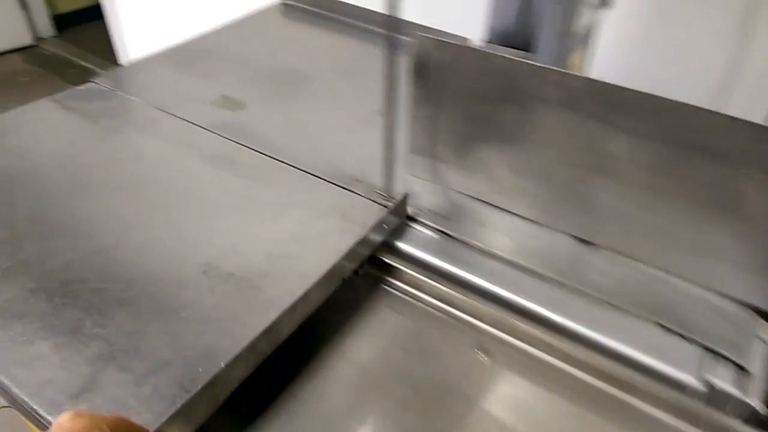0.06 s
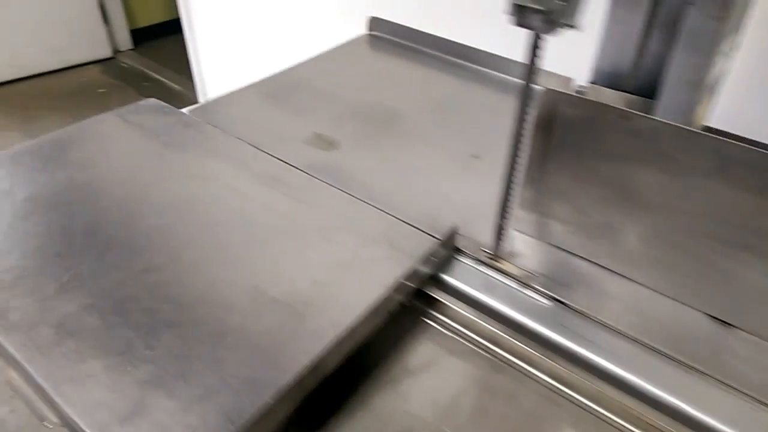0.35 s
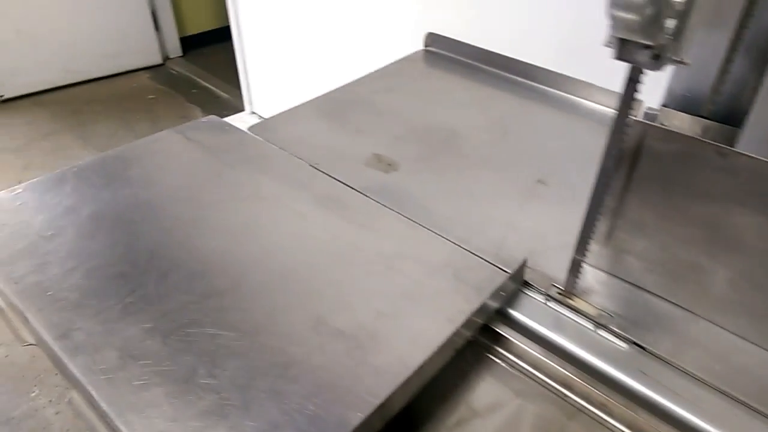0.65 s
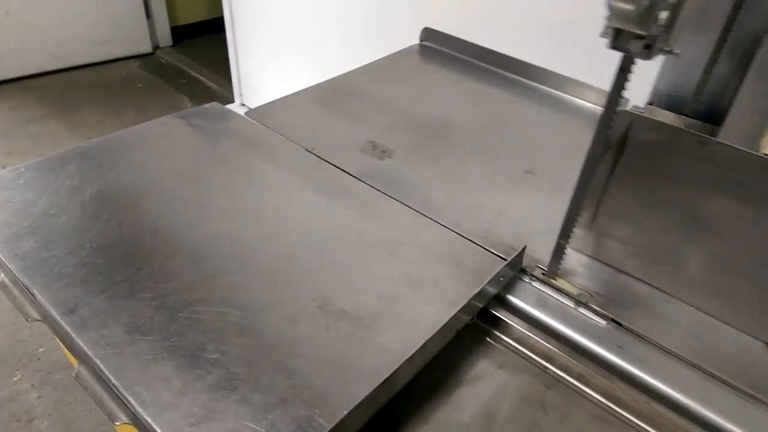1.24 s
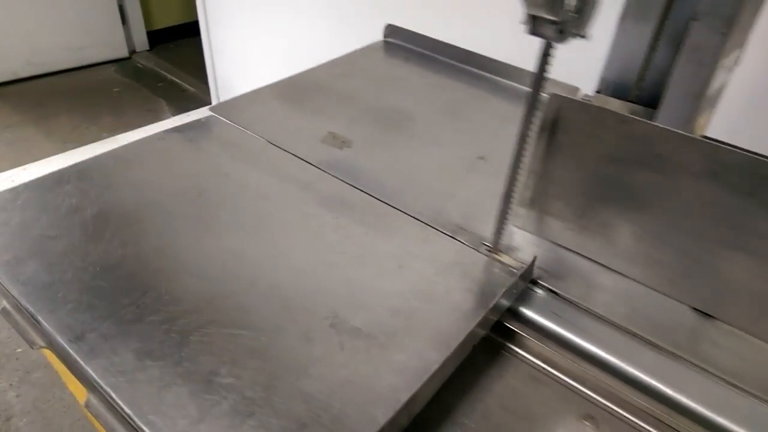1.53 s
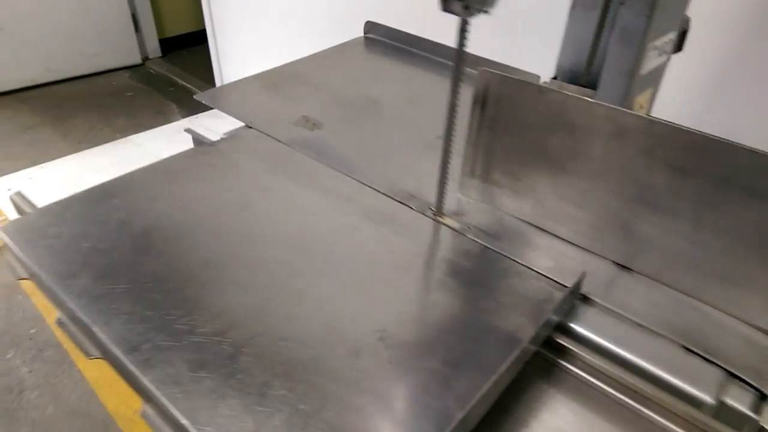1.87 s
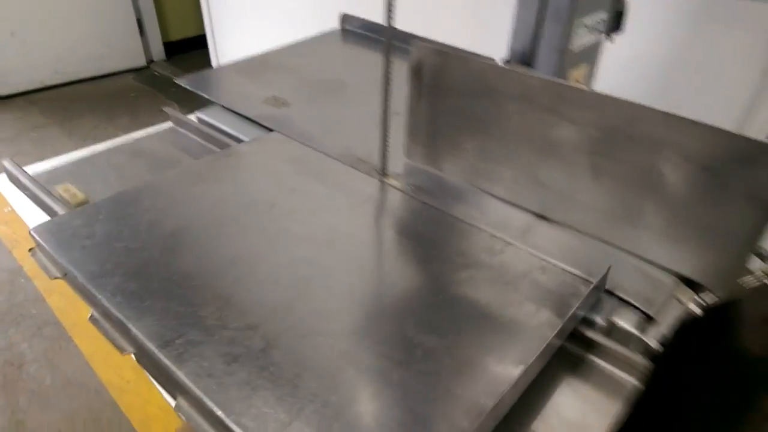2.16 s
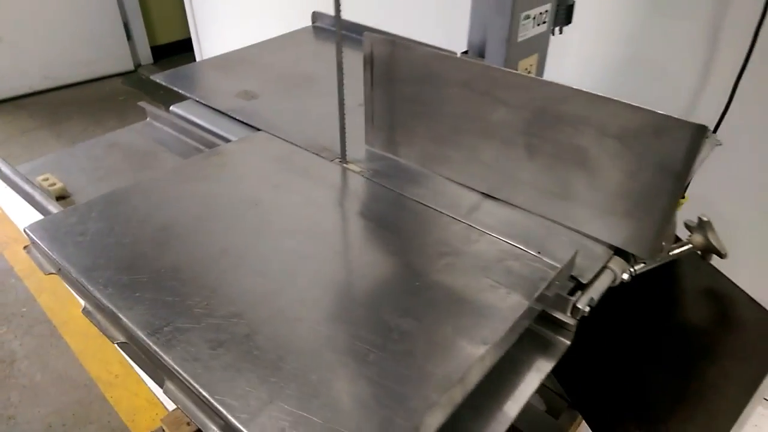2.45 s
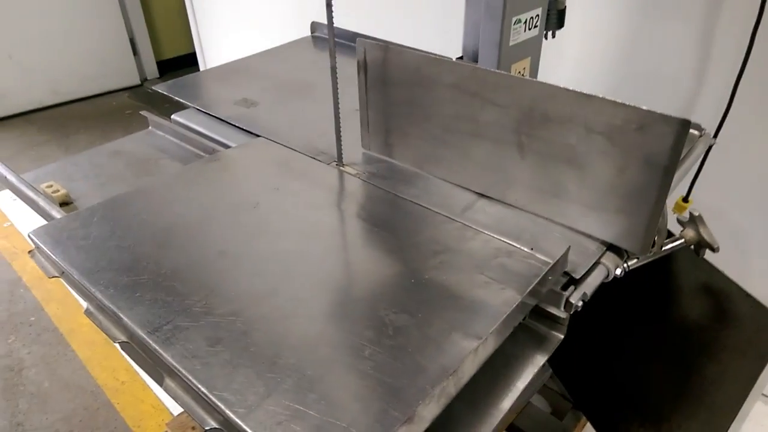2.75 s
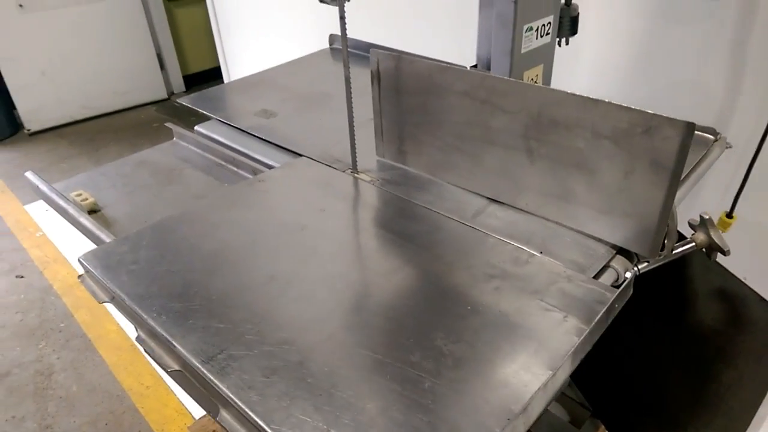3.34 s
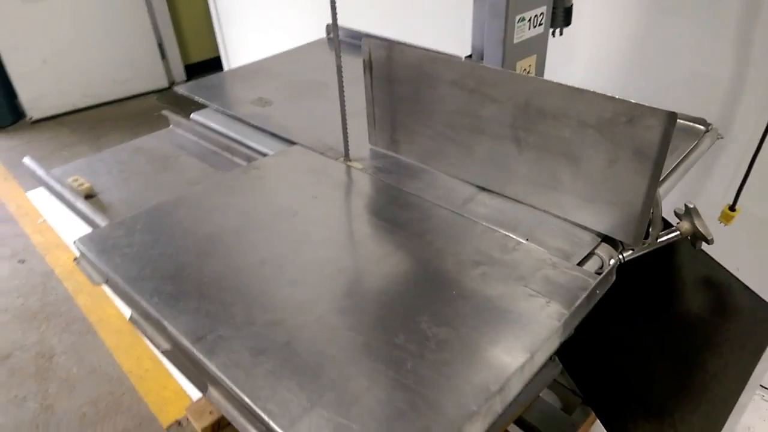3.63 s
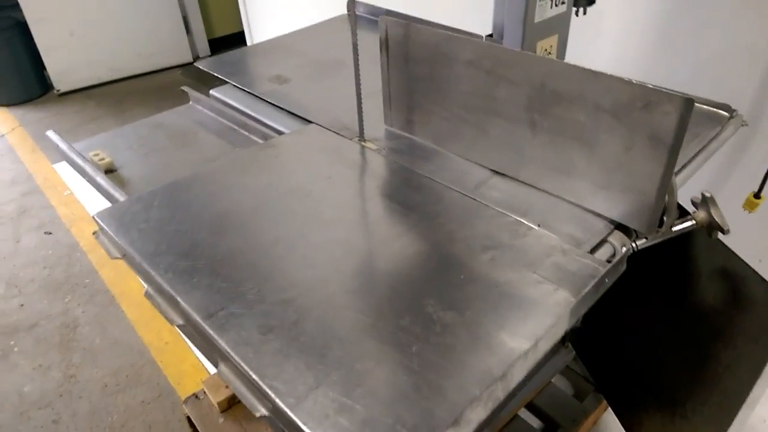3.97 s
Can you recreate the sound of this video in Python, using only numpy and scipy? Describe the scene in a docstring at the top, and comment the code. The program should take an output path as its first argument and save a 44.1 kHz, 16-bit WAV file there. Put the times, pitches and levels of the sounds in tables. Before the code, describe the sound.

In a hard room with a low hum, a sliding metal table rumbles, slams into its stop and rings. After a lull it rolls again, drumming and bumping, gets a light nudge, and a small knock sounds nearby.

```python
"""In a hard, humming room, the steel carriage table of an idle band saw rolls along its rail,
slams into the end stop, is pushed back the other way and is nudged once more. Rolling contact
is a stream of tiny impacts, the stop a few large ones; both excite the modes of the sheet steel,
which drums and rings. Near the end come a small close knock and two scuffs."""
import sys
import numpy as np
from scipy import signal
from scipy.fft import rfft, irfft
from scipy.io import wavfile
from scipy.ndimage import uniform_filter1d

SR = 44100
rng = np.random.default_rng(int(sys.argv[2]) if len(sys.argv) > 2 else 0)


def pcm_store(signal):
    """Save signal as 16-bit PCM."""
    levels = np.round(np.clip(np.atleast_2d(signal), -1, 1) * 32767)
    wavfile.write(sys.argv[1], SR, levels.astype(np.int16).T)


N = 176400
LEAD = SR // 2  # samples: the table is already rolling at time zero
TIME = np.arange(-LEAD, N) / SR
AGE = np.arange(2 * SR) / SR  # seconds since an impulse


def amp(db):
    """Decibels to amplitude ratio."""
    return 10 ** (np.asarray(db) / 20)


def unit(x):
    """Normalisation to unit energy."""
    return x / np.sqrt(np.sum(x ** 2) + 1e-20)


def noise():
    """Gaussian white noise."""
    return rng.standard_normal(len(TIME))


def curve_at(points, hz):
    """Interpolation on a log-frequency axis."""
    f, value = np.transpose(points)
    return np.interp(np.log(hz + 1), np.log(f), value)


def convolve(x, response):
    """A linear system's output, from its impulse response."""
    return signal.fftconvolve(x, response)[:len(x)]


def colour(x, spectrum, size=8192):
    """Minimum-phase filtering at unit energy, rolling off above the spectrum's last point."""
    hz = abs(np.fft.fftfreq(size, 1 / SR))
    rolloff = np.maximum(hz / spectrum[-1][0], 1) ** 3
    log_gain = np.log(amp(curve_at(spectrum, hz)) / rolloff)
    response = np.fft.ifft(np.exp(np.conj(signal.hilbert(log_gain)))).real
    return convolve(x, unit(response[:size // 2]))


def drift(cutoff_hz):
    """Low-pass random fluctuation of unit variance."""
    hz = np.fft.rfftfreq(len(TIME), 1 / SR)
    slow = irfft(rfft(noise()) / (1 + (hz / cutoff_hz) ** 4))
    return slow / slow.std()


def impulses(rows):
    """Ideal impacts: one impulse for each time in seconds and level in dB."""
    force = np.zeros(len(TIME))
    for start, db in rows:
        force[LEAD + round(start * SR)] += amp(db)
    return force


# Room hum. Each row: frequency in Hz, level in dB.
HUM_TONES = [(60, -70.5), (155, -61), (233, -65.5)]
# Air noise. Each row, as in every spectrum below: frequency in Hz, relative density in dB.
AIR_SPECTRUM = [(25, -59), (45, -0.5), (64, 14), (105, -14), (160, -7), (260, -9.5), (340, -3), (480, -30),
                (800, -25), (1500, -24), (3000, -47), (6000, -36.5), (15500, -39)]

def room(waver_hz=2.5):
    """Random frequency modulation makes a low hum waver over soft air noise."""
    hum = 0
    for hz, db in HUM_TONES:
        phase = 2 * np.pi * np.cumsum(hz + waver_hz * drift(6)) / SR
        hum += amp(db) * np.sqrt(2) * np.sin(phase)
    return hum + amp(-61) * colour(noise(), AIR_SPECTRUM)


# Decay of steel and room together. Each row: frequency in Hz, T60 in seconds.
RING_TIMES = [(60, 1.25), (150, 0.57), (300, 0.63), (1000, 0.79), (2000, .85), (4000, 0.49), (8000, 0.33),
              (16000, 0.38)]

def sheet_steel(force, tail_db, early_t60_s=0.066):
    """Dense modes overlap into decaying noise: a quick clatter, then a tail shared with the room."""
    early, late = rng.standard_normal((2, len(AGE)))
    early *= amp(-60 * AGE / early_t60_s)
    hz, age, bands = signal.stft(late, SR, nperseg=512)
    decay = amp(-60 * age / curve_at(RING_TIMES, hz)[:, None])
    tail = signal.istft(bands * decay, SR, nperseg=512)[1][:len(AGE)]
    spectrum = rfft(amp(3) * unit(early) + amp(tail_db) * unit(tail))
    spectrum /= np.sqrt(uniform_filter1d(abs(spectrum) ** 2, size=160))  # equal power across bands
    return convolve(force, unit(irfft(spectrum)[:-LEAD]))


# The table's main modes. Each row: frequency in Hz, relative level in dB, T60 in seconds.
TABLE_MODES = [(68.2, -13, 3.63), (97.4, 4, 1.1), (126.4, -7, 2.9), (153.8, -4.5, 3.1), (195.4, -1, 1.2),
               (250.8, 0, 1.9), (277.76, 10, .75), (340, 3, 0.94), (338.5, -4.5, 0.41), (345, -8.5, 0.36),
               (549, -13.5, 0.89), (717, 0.5, 0.89), (3035, -14.5, 0.18)]

def table_ring(force):
    """Modal superposition: the table responds as a sum of damped sinusoids."""
    ring = sum((-1) ** k * amp(db - 60 * AGE / t60) * np.sin(2 * np.pi * hz * AGE)
               for k, (hz, db, t60) in enumerate(TABLE_MODES))
    return convolve(force, unit(ring))


def rough_contact(impacts_per_s=6000, lump_hz=37):
    """Shot noise: rough surfaces meet in a lumpy stream of tiny impacts."""
    grit_db = 1.5 * np.minimum(rng.exponential(1, len(TIME)), 4)
    lump_db = 2.02 * drift(lump_hz)
    force = noise() * amp(grit_db + lump_db)
    force *= rng.random(len(TIME)) < impacts_per_s / SR
    return force / force.std()


# A close double knock. Each row: start in seconds, level in dB.
KNOCK_HITS = [(3.7122, -23), (3.7172, -21.5)]
KNOCK_SPECTRUM = [(40, -2), (200, 5.5), (450, 0.5), (900, -9), (2000, -17), (3500, -30), (8000, -47.5),
                  (16000, -54)]
# Brief rubs. Each row: start in seconds, length in seconds, level in dB.
SCUFF_STROKES = [(3.727, 0.036, -63.5), (3.771, 0.036, -61)]
SCUFF_SPECTRUM = [(200, -23), (650, -7), (850, 3), (1100, -9), (1600, -13), (2700, -18.5), (4000, -31.5),
                  (10000, -43.5)]

def knock_and_scuffs():
    """An impact sounds dry; then sliding friction excites the steel twice."""
    knock = colour(impulses(KNOCK_HITS), KNOCK_SPECTRUM)
    strokes = sum(amp(db) * np.sin(np.pi * np.clip((TIME - start) / length, 0, 1)) ** .5
                  for start, length, db in SCUFF_STROKES)
    friction = colour(strokes * rough_contact(), SCUFF_SPECTRUM)
    return knock + sheet_steel(friction, tail_db=-7)


# Dents in the rail and ticks of the bearings. Each row: start in seconds, level in dB.
DENT_HITS = [(1.784, -3.5), (1.96, -13), (2.002, 0.5), (2.075, -7), (2.147, -13), (2.182, -10),
             (2.245, -8.5)]
TICK_HITS = [(.242, -24), (.262, -52), (.572, -50), (1.255, -37.5), (1.551, -26.5), (1.729, -23),
             (1.786, -25.5), (1.862, -27), (2.055, -25), (2.211, -28), (2.236, -27), (2.877, -37.5),
             (2.971, -34)]
DENT_SPECTRUM = [(60, -30), (150, -10), (300, 9), (480, -21), (720, 18), (1200, -28.5), (2500, -8),
                 (6000, -59)]
TICK_SPECTRUM = [(300, 2), (1500, 9.5), (3000, 9), (6300, 4), (8000, -6.5), (10200, 1.5), (12000, -7),
                 (14200, -2.5)]

def dents_and_ticks(tick_decay_s=.02):
    """Transient excitation: rollers bump dully over dents and the bearings tick grittily."""
    rattle = unit(rng.standard_normal(len(AGE)) * np.exp(-AGE / tick_decay_s))
    bumps = colour(impulses(DENT_HITS), DENT_SPECTRUM)
    ticks = colour(convolve(impulses(TICK_HITS), rattle), TICK_SPECTRUM)
    return sheet_steel(bumps, tail_db=0.5) + sheet_steel(ticks, tail_db=-7)


# The table's travel. Each row: time in seconds, relative roller force in dB, relative drumming in dB.
TRAVEL = [(0, -1, -0.5), (.21, -4.5, 4.5), (.3, -9, -6), (.55, -8.5, -34), (.8, -20, -12.5),
          (1.02, -26.5, -23), (1.208, -29.5, -15.5), (1.362, -12, -2), (1.58, -2, 2.5), (1.85, -0.5, 0.5),
          (2.1, -0.5, 2), (2.26, -6.5, -0.5), (2.38, -27, -13), (2.6, -27, -18.5), (2.8, -29.5, -23),
          (2.88, -18, -8.5), (2.98, -20.5, -9.5), (3.219, -28.5, -18.5), (3.35, -35.5, -26.5),
          (4, -36, -37.5)]
# Bearing resonances. Each row: frequency in Hz, bandwidth in Hz, relative level in dB.
BEARING_MODES = [(6000, 150, 6), (9350, 280, 3.5), (10030, 260, 8)]
# Spectra of the rolling noise, from low to high.
RUMBLE_SPECTRUM = [(25, -64), (60, -13), (80, 9), (105, 6.5), (125, 11.5), (160, 9.5), (185, 6.5), (215, 9),
                   (300, 4), (600, -38.5)]
DRUM_SPECTRUM = [(100, -35.5), (150, -3), (195, -16.5), (245, -3), (290, 7), (335, 3), (420, -9.5),
                 (520, -7), (1200, -66)]
ROAR_SPECTRUM = [(200, -40), (450, -2.5), (620, -1.5), (750, 1.5), (900, -4), (1100, -5), (1500, -9.5),
                 (2100, -13.5), (3000, -21.5), (4500, -28.5), (6500, -35.5), (8000, -40)]
FIZZ_SPECTRUM = [(2000, -19.5), (4500, -10), (6100, -7), (7000, -4), (8500, -9), (9200, -1), (10700, -5.5),
                 (11300, -10.5), (14000, -11.5)]

def rolling(rumble_db_per_db=0.68, drive_band_hz=(190, 810)):
    """Forced vibration from the rollers: hollow drumming when slow, with roar and sizzle when fast."""
    times, *levels = np.transpose(TRAVEL)
    force_db, drum_db = (np.interp(TIME, times, level) for level in levels)
    grit = rough_contact()
    roller_force = grit * amp(force_db)
    drum_force = grit * amp(drum_db)
    rumble = colour(rough_contact() * amp(-37 + rumble_db_per_db * force_db), RUMBLE_SPECTRUM)
    drum = amp(-37) * colour(drum_force, DRUM_SPECTRUM)
    roar = amp(-35) * colour(roller_force, ROAR_SPECTRUM)
    fizz = amp(-68) * colour(roller_force, FIZZ_SPECTRUM)
    bearing_ring = sum(amp(db) * unit(np.exp(-np.pi * width * AGE) * np.sin(2 * np.pi * hz * AGE))
                       for hz, width, db in BEARING_MODES)
    sizzle = amp(-74) * convolve(roller_force, unit(bearing_ring))
    shaking = amp(-39.5) * signal.lfilter(*signal.butter(1, drive_band_hz, "band", fs=SR), drum_force)
    low = sheet_steel(rumble + drum, tail_db=-2.5)
    high = sheet_steel(roar + fizz + sizzle, tail_db=-2.5)
    return low + high + table_ring(shaking)


# Strikes on the stop. Each row: start in seconds, level in dB, relative treble in dB.
STOP_HITS = [(0.305, 15.5, -6.5), (.311, 5, 1), (0.3204, 8, 8), (0.3253, 12, -5.5), (0.3378, 1.5, -8.5),
             (0.37, 9.5, -15), (.401, 1.5, -7.5)]
THUD_SPECTRUM = [(30, -31.5), (60, -14), (95, -6), (135, 4), (190, -7.5), (260, 3.5), (360, 2), (470, -11),
                 (800, -16)]
CLATTER_SPECTRUM = [(200, -18.5), (500, -1.5), (1000, -1), (1550, 2), (2400, -6.5), (2900, -5),
                    (3400, -13.5), (4500, -12.5), (5500, -21), (6600, -21), (8200, -32.5), (10500, -24.5),
                    (12200, -43), (14200, -34)]

def end_stop(clatter_decay_s=0.0083, shove_at_s=.311, shove_cutoff_hz=500):
    """Impact and rebound: the table chatters, loose parts clatter and its weight rings the modes."""
    thud = colour(impulses([(start, db) for start, db, _ in STOP_HITS]), THUD_SPECTRUM)
    treble_hits = impulses([(start, db + treble - 7) for start, db, treble in STOP_HITS])
    clatter_power = convolve(treble_hits ** 2, unit(np.exp(-AGE / clatter_decay_s)) ** 2)
    clatter = colour(noise() * np.sqrt(abs(clatter_power)), CLATTER_SPECTRUM)
    shove = signal.lfilter(*signal.butter(1, shove_cutoff_hz, fs=SR), impulses([(shove_at_s, 15)]))
    return sheet_steel(thud, tail_db=0.5) + sheet_steel(clatter, tail_db=-1.9) + table_ring(shove)


def scene():
    """Superposition: the pressures of all sources add at one point."""
    return (rolling() + end_stop() + dents_and_ticks() + knock_and_scuffs() + room())[None, LEAD:]


def record(dry, cutoff_hz=15780):
    """Band limiting: a linear-phase low-pass removes the highest treble."""
    lowpass = signal.firwin(511, cutoff_hz, window=("kaiser", 9), fs=SR)
    return signal.oaconvolve(dry, lowpass[None], "same")


dry = scene()
out = record(dry)
pcm_store(out)
```